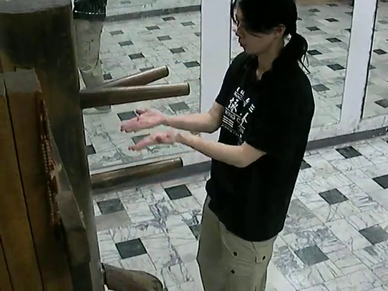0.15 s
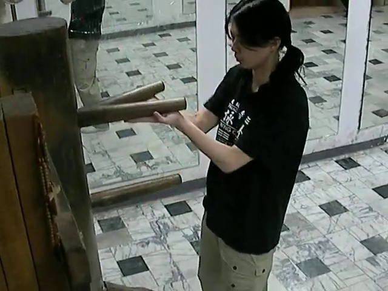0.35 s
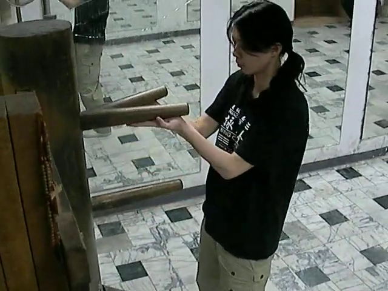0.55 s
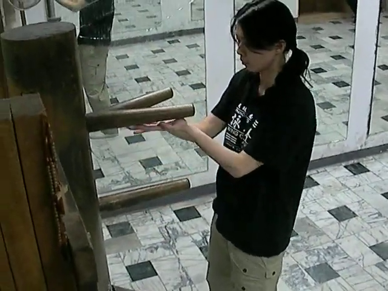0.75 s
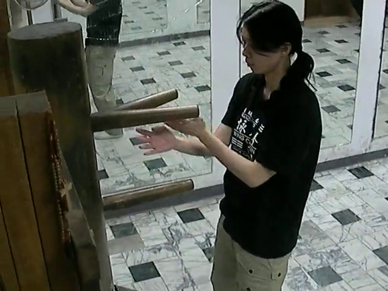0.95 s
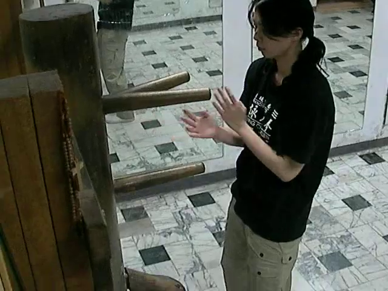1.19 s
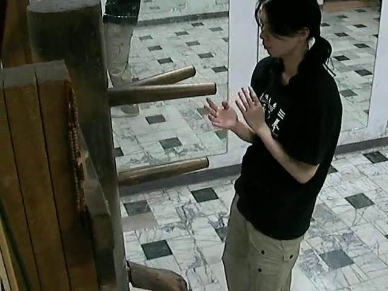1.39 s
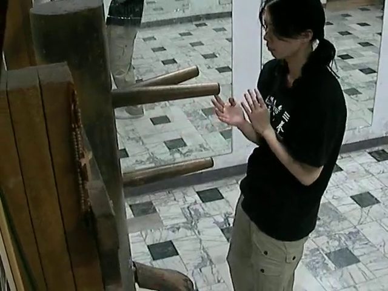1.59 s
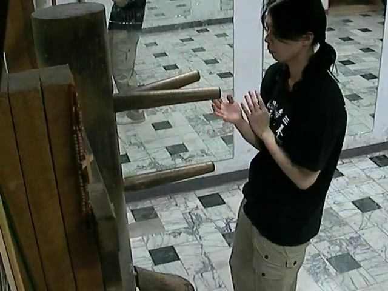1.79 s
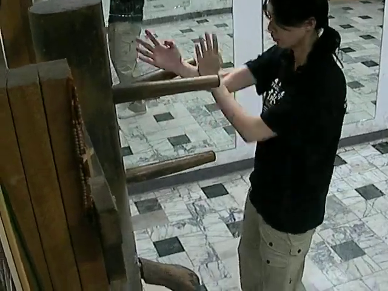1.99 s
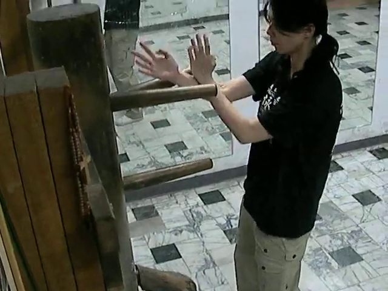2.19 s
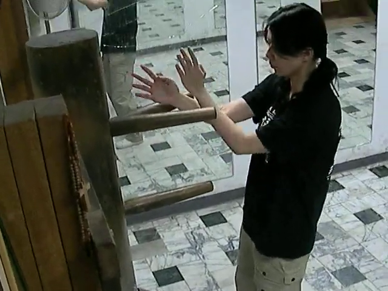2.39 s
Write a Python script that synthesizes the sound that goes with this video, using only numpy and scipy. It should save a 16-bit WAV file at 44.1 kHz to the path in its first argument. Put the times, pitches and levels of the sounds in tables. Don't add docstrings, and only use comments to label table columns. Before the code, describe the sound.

Bare palms slap a wooden dummy, then a duller second hit, with loose wooden arms knocking

```python
import sys
import numpy as np
from scipy import signal
from scipy.fft import rfft, irfft, next_fast_len
from scipy.io import wavfile
from scipy.ndimage import uniform_filter1d

SR = 44100
rng = np.random.default_rng(int(sys.argv[2]) if len(sys.argv) > 2 else 0)


def invert_db(level):
    return 10 ** (np.asarray(level, dtype=float) / 20)


def unload_wav(signal):
    wavfile.write(
        sys.argv[1],
        SR,
        np.round(np.clip(np.atleast_2d(signal).T, -1, 1) * 32767).astype(np.int16),
    )


N = 108045
SIZE = next_fast_len(2 * N)
HZ = np.arange(SIZE // 2 + 1) * SR / SIZE + 1e-3
T = np.arange(N) / SR
LEFT_RIGHT = np.array([[1], [-1]])


def curve(points):
    p = np.array(points, float)
    return np.interp(np.log(HZ), np.log(np.maximum(p[:, 0], 1)), p[:, 1])


def shape(x, gain):
    return irfft(rfft(x, SIZE) * gain, SIZE)[..., :N]


def unit(x):
    return x / np.sqrt(np.mean(x ** 2))


def ring(at, hz, t60, contact):
    u = np.maximum(T - at, 0)
    decay = np.exp(-np.log(1000) * u / t60)
    return np.sin(2 * np.pi * hz * u) * decay * (1 - np.exp(-u / contact))


# frequency in Hz, side against mid in dB.
FLOOR_SIDE = [(20, -26), (60, -19), (110, -14.5), (200, -17), (370, -12.5), (680, -3), (1240, -1.5),
              (2280, -0.5), (4180, 2.5), (7660, 0), (14000, -0.5)]


def steady_noise(spectrum, db, wobble):
    inside = (HZ >= spectrum[0][0]) & (HZ < spectrum[-1][0])
    mid, side = shape(rng.standard_normal((2, N)), invert_db(curve(spectrum)) * inside)
    scale = invert_db(db) * wobble / np.sqrt(np.mean(mid ** 2))
    return scale * (mid + shape(side, invert_db(curve(FLOOR_SIDE))) * LEFT_RIGHT)


# frequency in Hz, density in dB per Hz.
HUM = [(15, -76), (25, -61), (50, -24), (177, -5), (233, -3), (300, -10), (330, -14), (352, -21),
       (420, -31), (550, -46), (920, -120)]
HUM_DB, FLICKER_DB, FLICKER_HZ = -36.5, 1.5, 30


def hum():
    walk = unit(uniform_filter1d(rng.standard_normal(N), int(SR / FLICKER_HZ)))
    return steady_noise(HUM, HUM_DB, invert_db(FLICKER_DB * walk))


# frequency in Hz, density in dB per Hz.
HISS = [(250, -43), (420, -2), (2140, -7.5), (2810, -8.5), (6250, -19.5), (7660, -19), (10100, -20.5),
        (12400, -17.5), (13500, -32), (13950, -26)]
HISS_DB = -52


def hiss():
    return steady_noise(HISS, HISS_DB, 1)


# frequency in Hz, side against mid in dB.
ROOM_SIDE = [(200, -13.5), (500, -20), (1000, -15.5), (2000, -15), (4000, -4), (8000, -2.5), (13000, -4.5)]


def skin_grit():
    grain_gain = invert_db(3 * rng.standard_normal(N))
    mid, side = rng.standard_normal((2, N)) * grain_gain
    return mid + shape(side, invert_db(curve(ROOM_SIDE))) * LEFT_RIGHT


# frequency in Hz, level in dB.
SKIN = [(300, 3.5), (900, -0.5), (1800, 5.5), (3000, 9), (4500, 6.5), (6500, 1.5), (9000, 0.5),
        (13000, -0.5)]
SIZZLE_HZ = 8100
# end in seconds, level in dB, swell in seconds.
SWELLS = [
    (.2455, -35, .014),
    (.594, -57, .01),
    (1.951, -43, .009),
]


def swells(grit):
    colour = curve(SKIN) - 1.0 * (HZ >= SIZZLE_HZ)
    out = 0
    for end, db, swell in SWELLS:
        rising = grit * (T < end) * np.exp(np.minimum(T - end, 0) / swell)
        out = out + shape(rising, invert_db(db + colour))
    return out


# start in seconds, level in dB, pitch in Hz, t60 in seconds.
SNAPS = [
    (0.2456, -1, 3060, 0.0031),
    (0.2455, 1.5, 4680, 0.0019),
    (.2470, -3, 4060, .004),
    (0.28, -16, 3950, 0.022),
    (.737, -38, 1900, 0.017),
]


def snaps():
    return sum(invert_db(db) * ring(at, hz, t60, .0002) for at, db, hz, t60 in SNAPS)


# start in seconds, level in dB, decay in seconds, sizzle in dB, crack in Hz.
SLAPS = [(0.246, -16.5, 0.00093, 9, 3080), (0.2476, -9, 0.0012, 2, 4500), (0.2512, -23, 0.0012, 0, 2180),
         (.2550, -15, 0.00071, 0, 5000), (0.259, -43, 0.003, -1, 3500), (0.278, -22, 0.0033, -20, 5500),
         (0.3020, -19, 0.002, 8, 4180), (0.3059, -17.5, 0.0015, 8, 3760), (.311, -13.5, 0.003, -1.5, 4200),
         (0.3153, -22, 0.004, -4.5, 3500), (.5945, -69, 0.0017, 3.5, 3940), (.606, -55, 0.0043, -2, 4000),
         (0.347, -25, 0.018, -23, 3250), (0.59, -43.5, 0.036, 5, 3080), (1.950, -31.5, 0.006, 0, 3300),
         (1.955, -31.5, 0.013, 4, 3500), (1.966, -29, 0.013, -2.5, 5400), (1.983, -23, 0.011, -5, 4220),
         (2.0198, -27, 0.017, 1, 3670), (2.029, -21.5, 0.0029, -30, 5600), (2.065, -50, 0.027, 7.5, 3320)]
CRACK_DB, CRACK_OCTAVES, SIZZLE_PAN_DB = 1, 0.27, 1.5
RISE_SHARE = 0.21


def slaps(grit):
    skin, top = curve(SKIN), HZ >= SIZZLE_HZ
    lean = SIZZLE_PAN_DB / 2 * LEFT_RIGHT
    out = 0
    for at, db, decay, sizzle_db, hz in SLAPS:
        u = np.maximum(T - at, 0) / decay
        burst = grit * np.exp(-u) * (1 - np.exp(-u / RISE_SHARE))
        crack = CRACK_DB * np.exp(-(np.log2(HZ / hz) / CRACK_OCTAVES) ** 2)
        colour = skin + np.where(top, sizzle_db + lean, crack)
        out = out + shape(burst, invert_db(db + colour))
    return out


# frequency in Hz, t60 in seconds.
ROOM_T60 = [(200, 0.79), (600, 0.54), (1500, 0.72), (4000, 0.66), (7000, 0.57), (12000, 0.53)]
# frequency in Hz, level in dB.
ROOM_DB = [(200, 4), (600, 0.5), (1500, -1.5), (4000, -10), (7000, -7.5), (12000, -10)]
BUILD_S = 0.0022


def room():
    noise = rng.standard_normal((2, N))
    table_hz, table_s = np.array(ROOM_T60).T
    out = 0
    for hz in 60 * 2 ** np.arange(0, 8.1, .5):
        t60 = np.interp(np.log(hz), np.log(table_hz), table_s)
        band = shape(noise, np.maximum(1 - 2 * abs(np.log2(HZ / hz)), 0))
        out = out + band * np.exp(-np.log(1000) * T / t60) * (1 - np.exp(-T / BUILD_S))
    mid, side = out[0], shape(out[1], invert_db(curve(ROOM_SIDE)))
    ears = np.array([mid + side, mid - side])
    return rfft(ears, SIZE) * invert_db(curve(ROOM_DB)) / np.sqrt(np.sum(mid ** 2))


# start in seconds, level in dB, pitch in Hz, t60 in seconds.
ROCKS = [(0.259, -17, 146.6, 0.27), (0.275, -14, 303.4, 0.18), (0.284, -4, 236, 0.11), (.290, -1, 204, 0.1),
         (0.313, -3, 298.4, 0.19), (.328, -8, 236.5, 0.21), (0.339, -5.5, 200.6, 0.1),
         (0.357, -6, 182.5, 0.098), (0.336, -15, 135, 0.15), (0.38, -4.5, 298, .3),
         (.382, -16, 270.8, 0.21), (0.399, -9.5, 229, 0.18), (.450, -21, 341, 0.17),
         (.520, -27.5, 333, 0.24), (0.423, -18.5, 147, 0.15), (.455, -15.5, 193.2, 0.37),
         (.465, -9, 243.5, 0.25), (0.501, -19, 307, .15), (.548, -13.5, 283, 0.13), (0.559, -25, 190, 0.12),
         (.595, -24.5, 330.5, 0.2), (.680, -27, 248, 0.75), (1.952, -13, 185, 0.11),
         (1.975, -1.5, 212, .18), (1.982, -13, 319, 0.17), (2.006, -4.5, 199.6, 0.12),
         (2.018, -12.5, 125, 0.11), (2.036, -9, 268.8, 0.17), (2.041, -11, 165, 0.088),
         (2.069, -17.5, 187, 0.49), (2.100, -16, 304, 0.16), (2.101, -11.5, 210.2, 0.14),
         (2.146, -12.5, 218, 0.13), (2.166, -11.5, 281, 0.072), (2.148, -23, 127, 0.22),
         (2.190, -18.5, 252, 0.19), (2.251, -24.5, 204.4, 0.19), (2.28, -32, 240, 0.092)]
THUD_S, RADIATES_HZ = 0.003, 103


def trunk():
    boom = sum(invert_db(db) * ring(at, hz, t60, THUD_S) for at, db, hz, t60 in ROCKS)
    return shape(boom, 1 / (1 - 1j * RADIATES_HZ / HZ) ** 2)


# start in seconds, level in dB, contact in seconds, strongest ring near in Hz.
KNOCKS = [(.2790, -13, 0.00057, 870), (.287, -23.5, 0.00042, 477), (.298, -16.5, 0.00039, 1150),
          (.33, -17.5, 0.00035, 545), (.36, -17, 0.00034, 840), (.397, -20.5, 0.00046, 480),
          (.43, -28, 0.00046, 720), (1.972, -21.5, 0.00047, 655), (1.987, -20.5, 0.00036, 1530),
          (1.995, -24.5, 0.0011, 563), (2.052, -28, 0.0028, 510), (2.075, -29.5, 0.0005, 670),
          (2.12, -34, 0.0009, 620), (.348, -23, .0005, 1450), (.455, -33.5, 0.0022, 460),
          (1.9623, -31, .0005, 1340)]
# frequency in Hz, level in dB, t60 in seconds.
ARM = [(429, -11, 0.06), (515.5, 0.5, 0.059), (550, -3, .04), (651, -2.5, 0.032), (706, -5, 0.052),
       (838, -2, 0.016), (970, -1.5, 0.021), (1150, -4, 0.049), (1348, -2, 0.038), (1509, 2, 0.036),
       (1700, -11, 0.021), (1830, -11, 0.014), (2096, 5, 0.019)]
FOCUS_DB = -12


def knocks():
    out = 0
    for at, db, contact, focus in KNOCKS:
        for hz, mode_db, t60 in ARM:
            level_luck, pitch_luck = rng.standard_normal(2)
            focus_db = FOCUS_DB * np.log2(hz / focus) ** 2
            gain = invert_db(db + mode_db + 3.06 * level_luck + focus_db)
            out = out + gain * ring(at, hz * (1 + 0.032 * pitch_luck), t60, contact)
    return out


SLEEVE_S, SLEEVE_LENGTH_S, SLEEVE_DB, SLEEVE_HZ = 1.85, .13, -64, 8500


def sleeve():
    colour = (HZ > SLEEVE_HZ) * (SLEEVE_HZ / HZ) ** 2
    brush = unit(shape(rng.standard_normal((2, N)), colour))
    return invert_db(SLEEVE_DB) * brush * np.exp(-((T - SLEEVE_S) / SLEEVE_LENGTH_S) ** 2)


WET_SLAP_DB, WET_KNOCK_DB, WET_TRUNK_DB = 5, -2.5, -17


def scene():
    background = hum() + hiss()
    grit = skin_grit()
    skin = swells(grit) + snaps() + slaps(grit)
    boom, wood = trunk(), knocks()
    send = invert_db(WET_SLAP_DB) * skin + invert_db(WET_KNOCK_DB) * wood + invert_db(WET_TRUNK_DB) * boom
    return background + skin + boom + wood + shape(send, room()) + sleeve()


# frequency in Hz, left minus right in dB.
BALANCE_DB = [(60, 4), (110, -0.5), (200, 0.15), (370, -0.1), (680, 1.0), (1240, 0.0), (2280, -1.5),
              (4180, -1), (7660, -1.5), (14000, 2.5)]
NOTCH_HZ, NOTCH_WIDTH_HZ, NOTCH_DB, TOP_HZ = 8000, 330, -32, 13520
SHOULDER_DB, SHOULDER_HZ = -9, 980
LEAK_DB, LEAK_HZ, LEAK_WIDTH_HZ = 21, 7975, 25


def microphones(x):
    db = NOTCH_DB * np.exp(-((HZ - NOTCH_HZ) / NOTCH_WIDTH_HZ) ** 4)
    db = db + SHOULDER_DB * np.exp(-((HZ - NOTCH_HZ) / SHOULDER_HZ) ** 2)
    db = db + LEAK_DB * np.exp(-((HZ - LEAK_HZ) / LEAK_WIDTH_HZ) ** 2)
    above = HZ - TOP_HZ
    db = db - 30 * np.clip(above / 200, 0, 1) - 40 * np.clip(above / 1000, 0, 2)
    return shape(x, invert_db(db + curve(BALANCE_DB) / 2 * LEFT_RIGHT))


# frequency in Hz, threshold in dB above the band's quiet level.
GATE = [(6700, -20), (7000, 3), (7400, 8), (8300, 9), (8700, 2.1), (9600, .5), (10400, .9), (11000, 2.1),
        (12400, 2.4), (12800, 12), (13500, 17.5)]


def gate(x):
    frames = dict(nperseg=2048, noverlap=1024, window="cosine")
    hz, _, z = signal.stft(x, SR, **frames)
    bands = z[:, :1024].reshape(2, 128, 8, -1)
    db = 10 * np.log10(np.mean(abs(bands) ** 2, axis=(0, 2)) + 1e-20)
    quiet = np.percentile(db, 25, axis=1)
    limit = quiet + np.interp(hz[4::8], *np.array(GATE).T)
    z[:, :1024] *= np.repeat(db > limit[:, None], 8, axis=0)
    return signal.istft(z, SR, **frames)[1][:, :N]


def top_cut(x):
    return signal.sosfilt(signal.butter(12, 14640, fs=SR, output="sos"), x)


def record(dry):
    finished = gate(microphones(dry))
    return top_cut(finished)


dry = scene()
out = record(dry)
unload_wav(out)
```